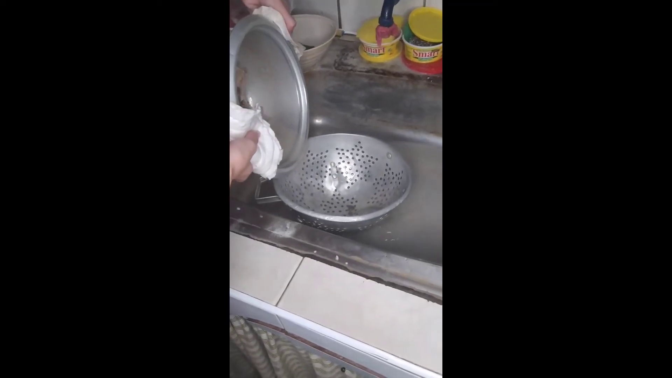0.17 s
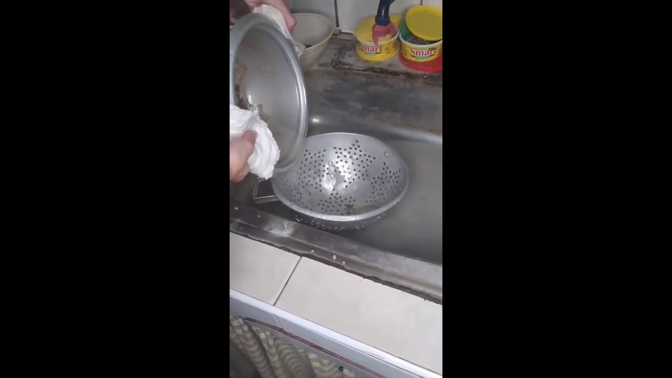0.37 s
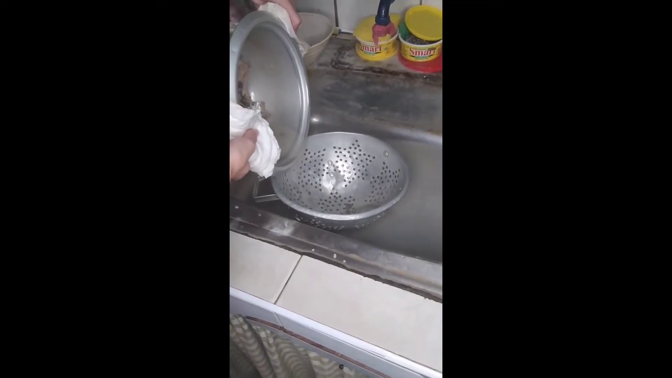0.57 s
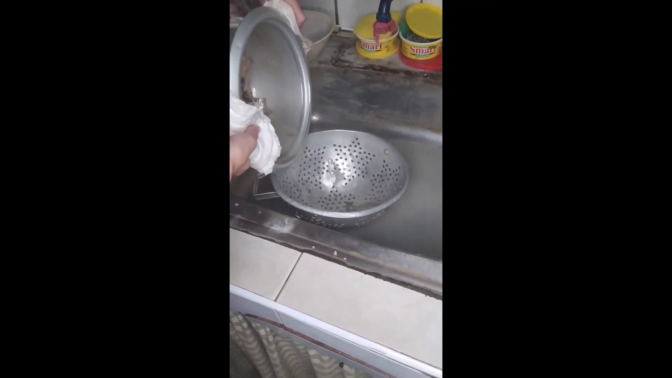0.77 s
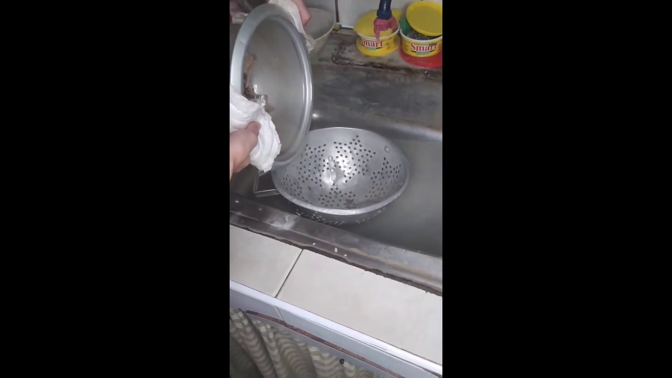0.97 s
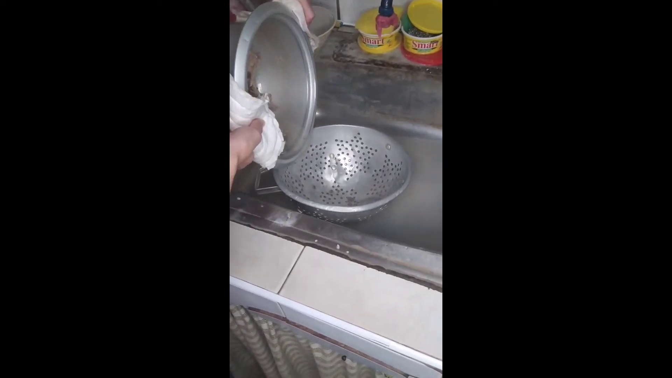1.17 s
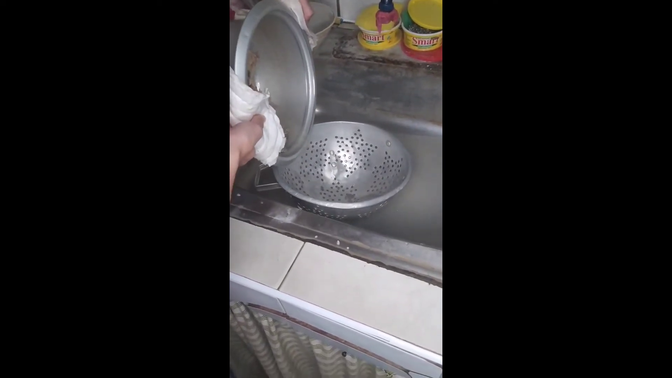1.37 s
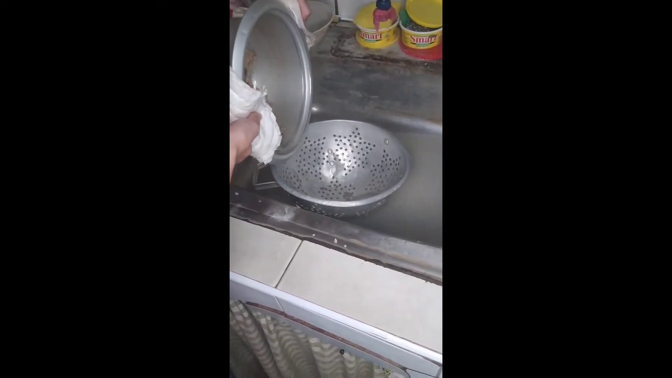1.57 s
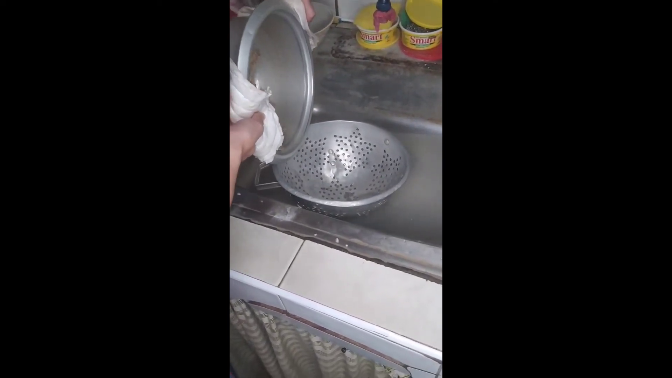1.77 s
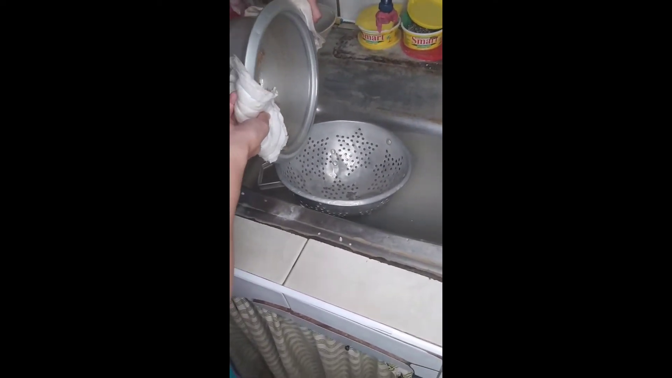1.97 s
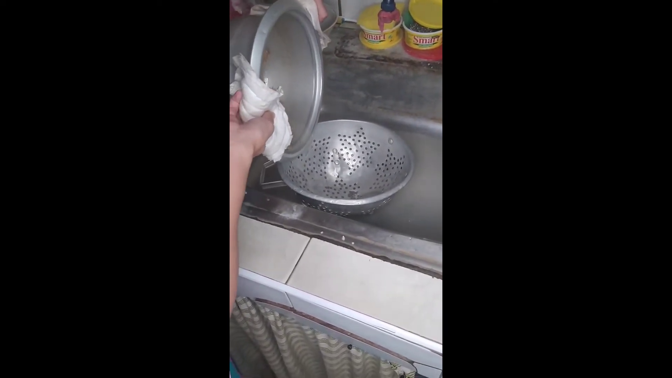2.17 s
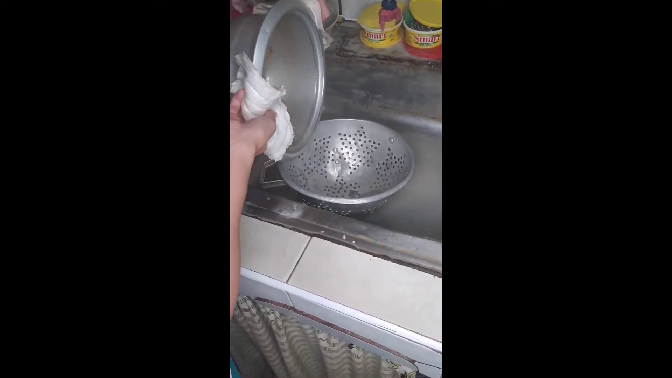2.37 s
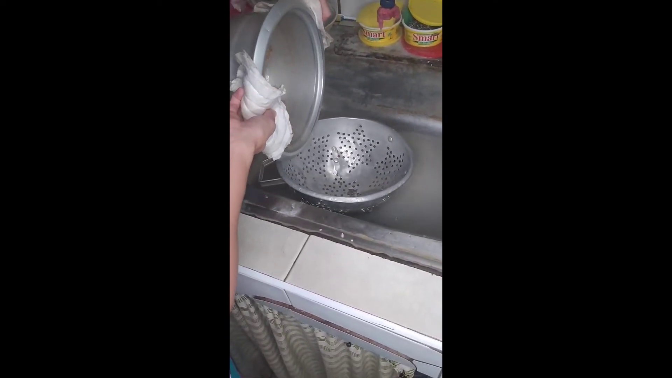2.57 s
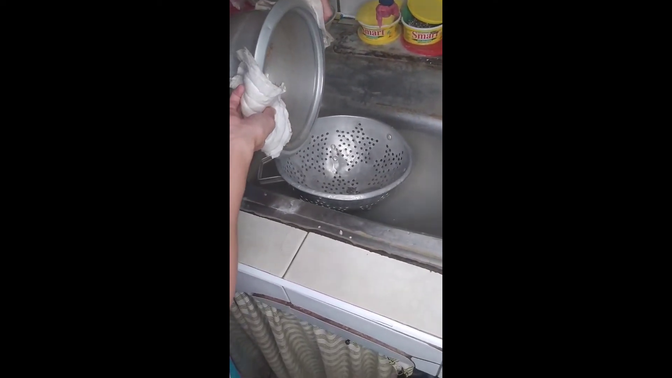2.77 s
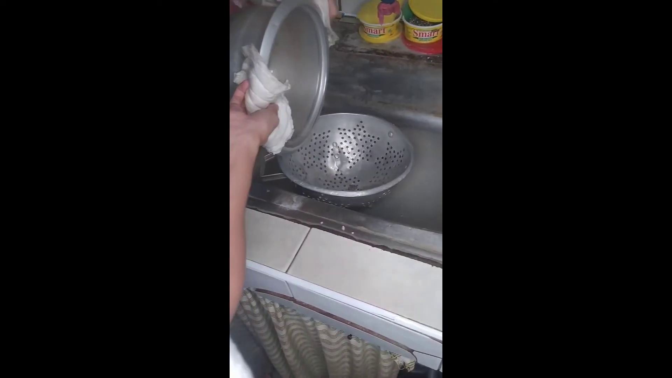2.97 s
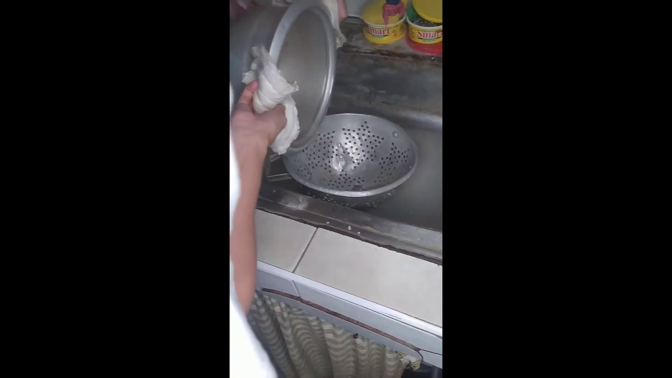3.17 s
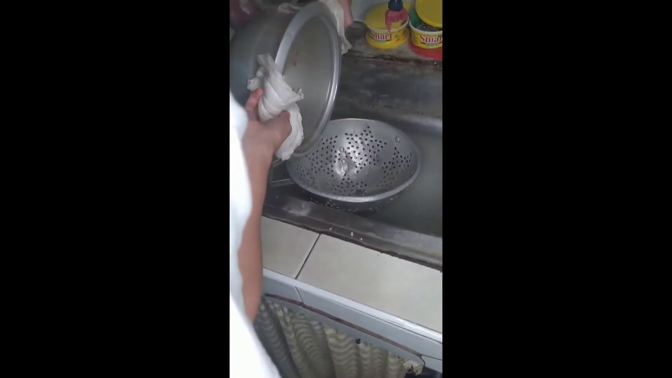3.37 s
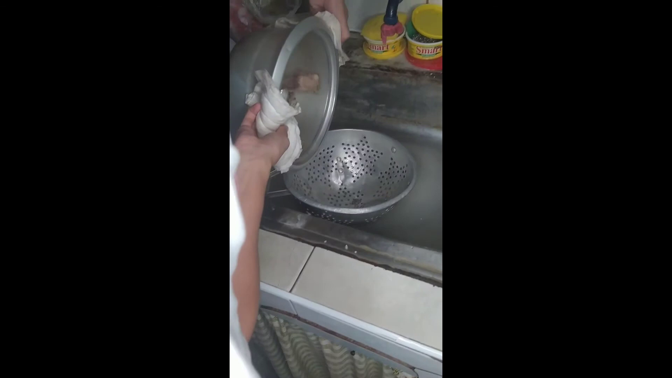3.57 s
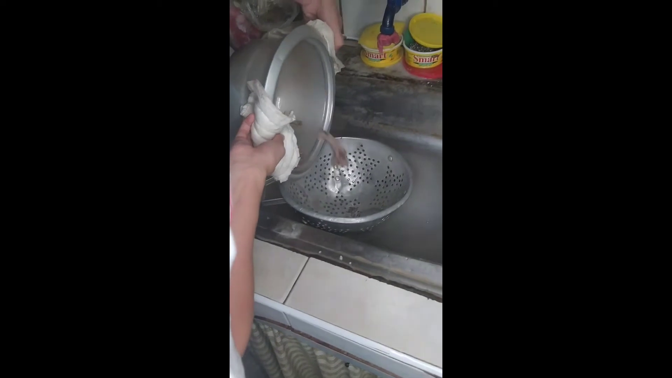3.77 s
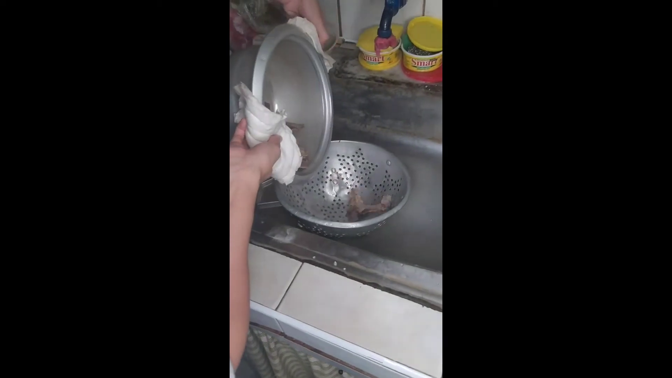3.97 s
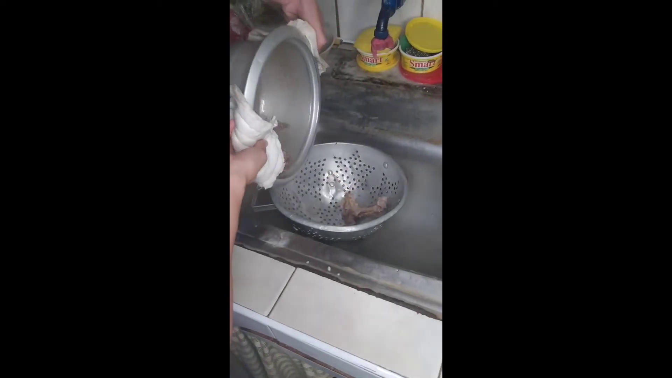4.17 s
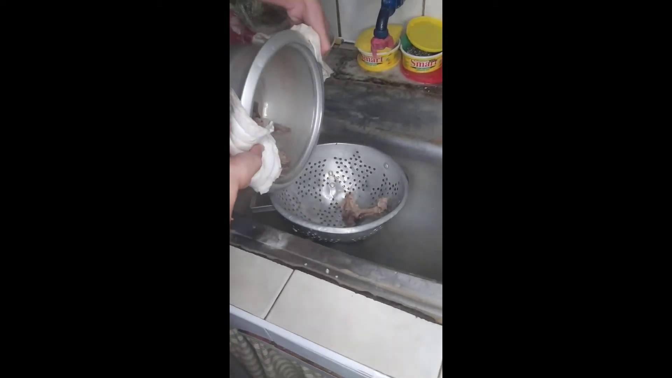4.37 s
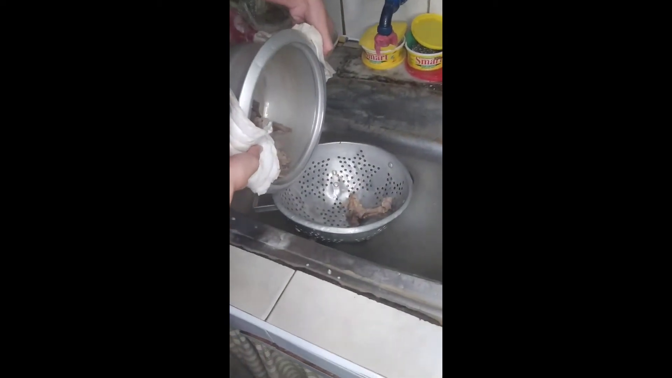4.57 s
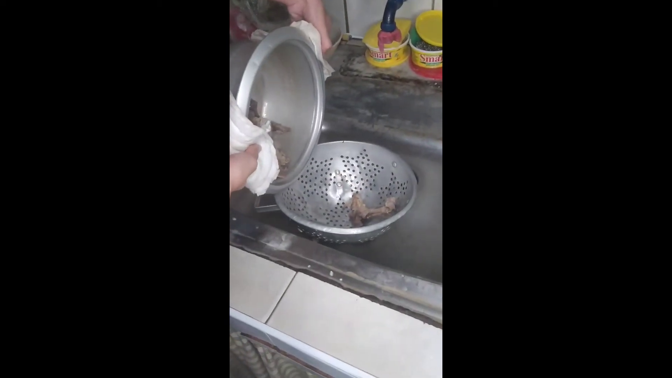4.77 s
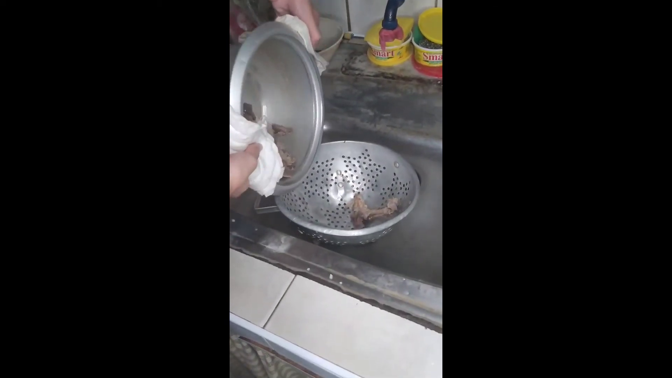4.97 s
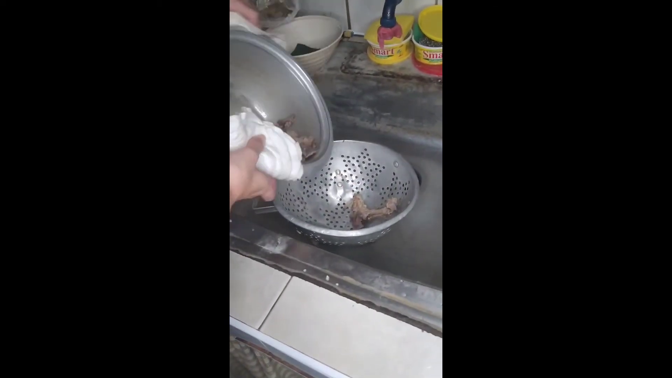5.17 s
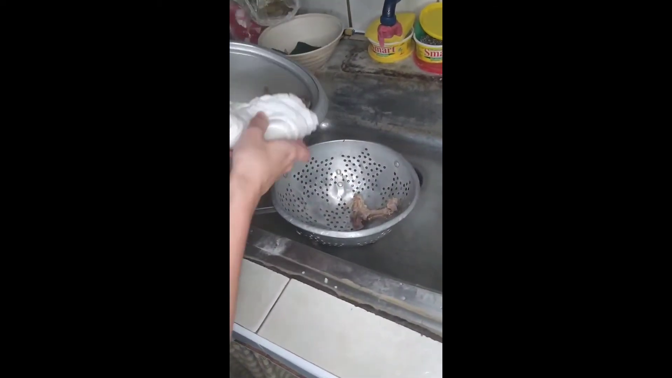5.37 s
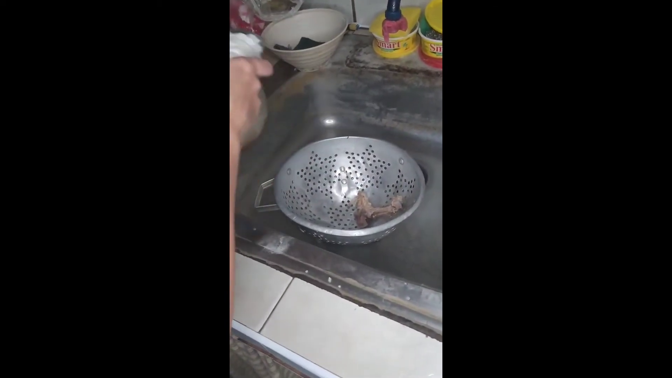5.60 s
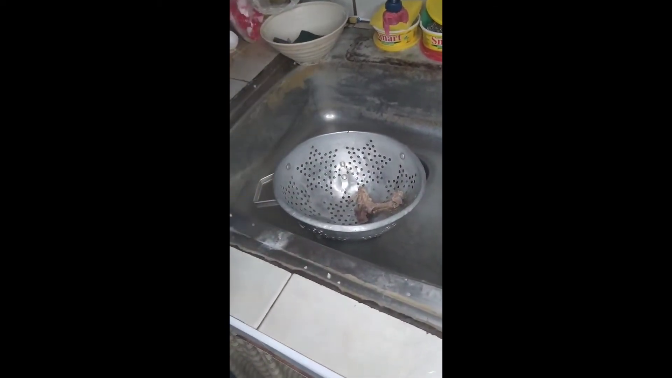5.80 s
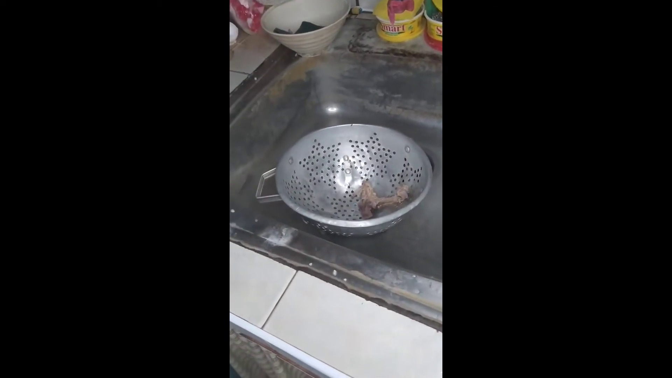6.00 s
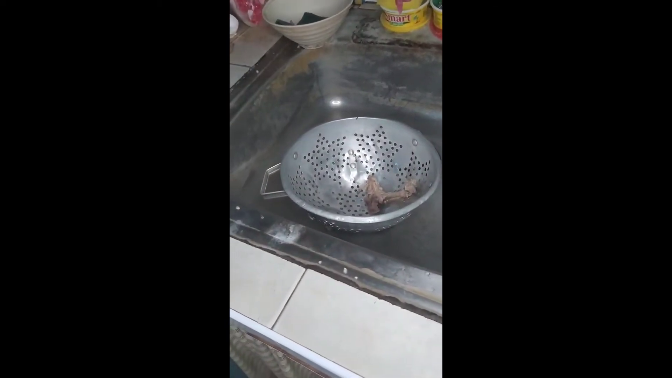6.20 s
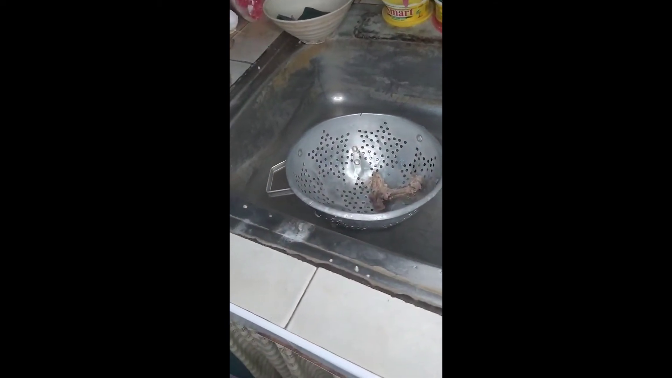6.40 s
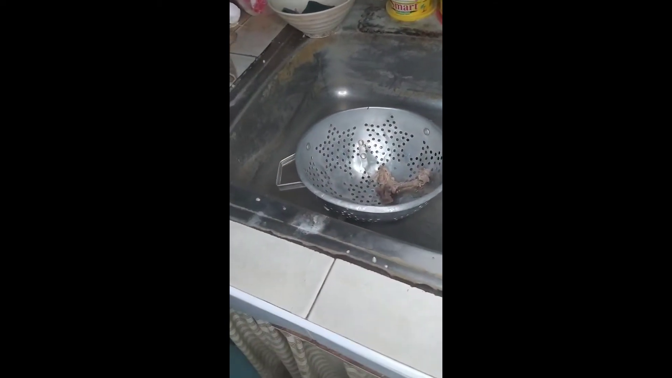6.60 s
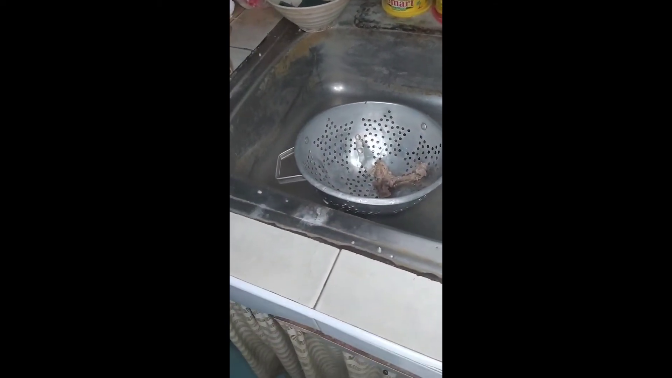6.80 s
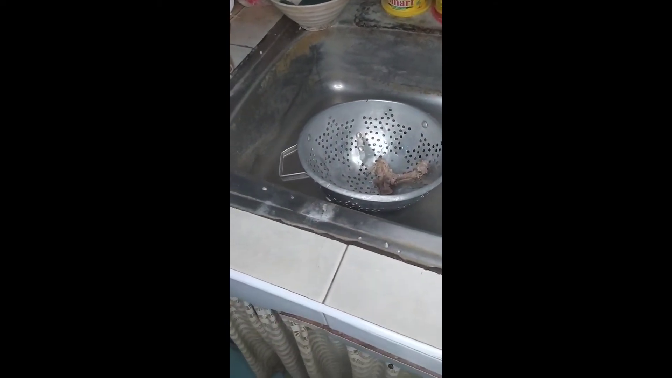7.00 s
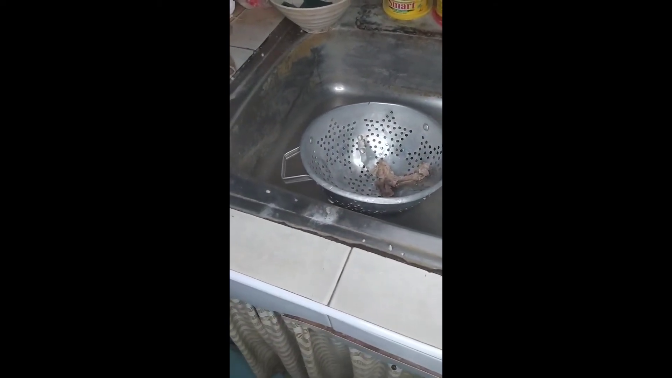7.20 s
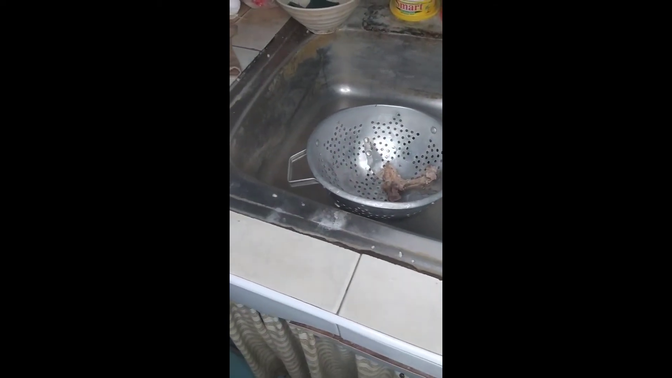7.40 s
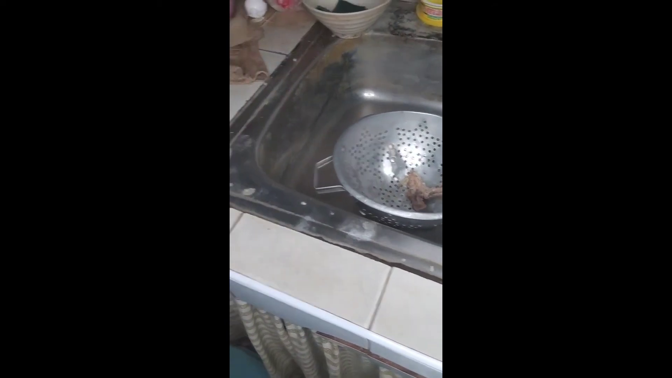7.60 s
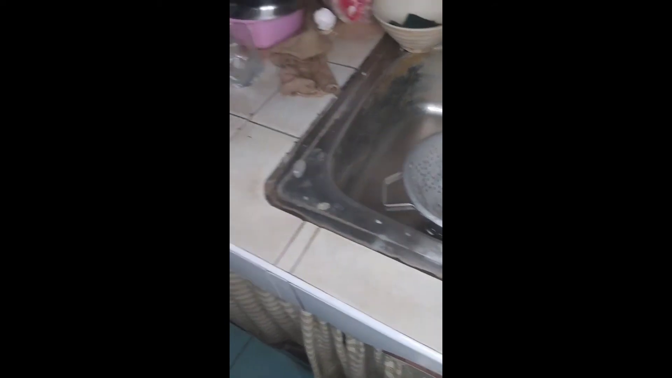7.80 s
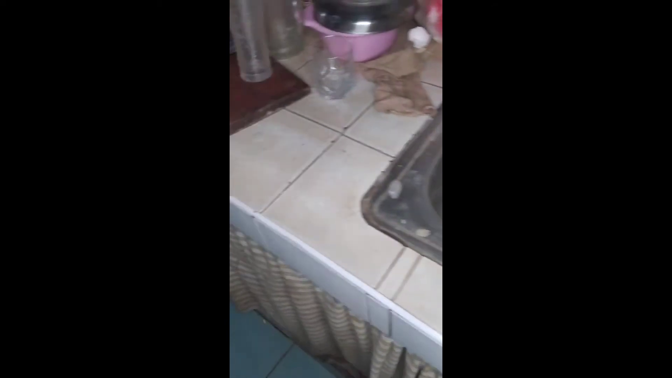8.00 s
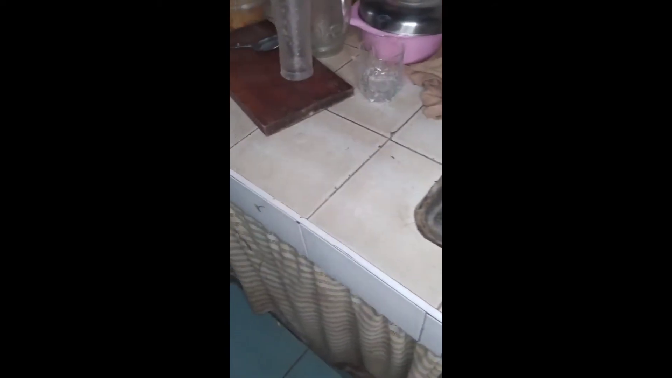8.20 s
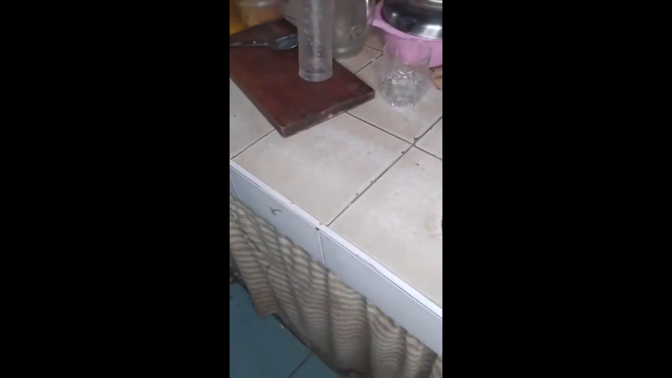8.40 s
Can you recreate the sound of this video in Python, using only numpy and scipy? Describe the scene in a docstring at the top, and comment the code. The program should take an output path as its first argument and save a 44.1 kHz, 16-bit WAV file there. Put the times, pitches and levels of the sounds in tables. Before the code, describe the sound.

Close in a small kitchen, a thinning trickle of liquid spatters brightly into a metal colander in a steel sink and stops. The pot rim clinks on the colander, then a bone drops in with a loud rattling, booming crash. The pot creaks, lands with a clonk and skids; cloth rustles, kitchenware knocks, and a heavy object groans along the counter. Handheld stereo pickup with low rumble and faint hiss.

```python
"""The last of a pot of stock trickles through a metal colander in a steel sink, over rumble, hiss and deep
buffeting. The pot's rim clinks on the colander, the pot creaks, and cloth swishes briefly; then a bone crashes
into the colander. The pot creaks as it swings away, lands with a clonk and skids; at the end a heavy object
groans along the counter. Cloth rustles and kitchenware knocks from early on to near the end. Impacts are
decaying modes and noise bursts; water and friction are coloured noise with irregular gains, and the groan is a
set of tones of wavering pitch."""
import sys
import numpy as np
from scipy import signal
from scipy.fft import rfft, irfft
from scipy.io import wavfile
from scipy.ndimage import uniform_filter1d

SR = 44100
rng = np.random.default_rng(int(sys.argv[2]) if len(sys.argv) > 2 else 0)


def store_wav(level_fs):
    """Save 16-bit WAV to argv[1]."""
    pcm = np.round(np.clip(np.atleast_2d(level_fs), -1, 1) * 32767)
    wavfile.write(sys.argv[1], SR, pcm.T.astype(np.int16))


N = 372644

# Levels in the tables are relative: the functions add the gain of each layer.
# slow drift of the kitchen's rumble and of a separate deep buffeting: time_s, rumble_db, deep_buffeting_db
LOW_NOISE_DRIFT = [(0, -58, -72), (1.7, -60, -65.5), (2.4, -63, -68), (4.7, -63.5, -63), (5.3, -64, -66.5),
                   (6.4, -66, -68), (7.3, -65.5, -62.5), (8.44, -65, -67)]
# the trickle thins out and stops: time_s, level_db
FLOW_LEVEL = [(0.0, -61.5), (0.14, -58.5), (0.9, -62), (1.75, -64), (1.92, -73), (2.3, -91)]
# large drops from the lip of the pot: start_s, level_db, pitch_hz
LARGE_DROPS = [(0.1151, -37, 8700), (0.16, -36, 9100), (0.294, -33, 10150), (0.338, -38.5, 10900),
               (0.355, -35.5, 9150), (0.472, -41, 9100), (0.572, -39.5, 10700), (0.7924, -39.5, 9200),
               (0.8979, -41, 8100), (1.012, -43, 3840), (1.1, -41.5, 10600), (1.2003, -41, 9740)]
# knocks of kitchenware: start_s, hollow_body_db, bright_tick_db, left_right_db, room_db
KNOCKS = [(1.32, -54.5, -45, 6, -2), (1.698, -76, -54, 6, 1), (1.843, -61, -52.5, 8, -7),
          (3.311, -65, -57, 0, -23), (3.454, -82, -59, 2, 1), (3.656, -71, -53.5, -4, -18),
          (3.836, -50.5, -49, -3, -1), (6.9935, -53, -42, 8, -3.5), (7.1783, -39, -52, 7.5, -1),
          (7.6, -53, -46.5, 7, -4.5), (7.69, -38.5, -36, 5, -9.5), (7.705, -51.5, -45.5, 9, -5),
          (7.816, -51, -74, -1, -9)]
# the pot nudges the colander and the sink answers: start_s, body_db, tick_db, sink_boom_db
NUDGES = [(1.579, -40.5, -47, -20), (2.8242, -50, -80, -41)]
# strokes of cloth and hands over metal: start_s, length_s, fine_hiss_db, coarse_rubbing_db
STROKES = [(2.47, 0.28, -68, -65.5), (3.428, 0.25, -75, -67), (4.425, 0.27, -67, -65),
           (5.439, 0.23, -58, -65.5), (5.977, 0.2, -61, -69), (6.212, 0.2, -55, -67.5),
           (6.45, 0.24, -62, -67.5), (6.994, 0.15, -58.5, -60), (7.148, 0.059, -56, -65),
           (7.411, 0.33, -70, -66), (7.602, 0.16, -56, -71), (7.708, 0.32, -62, -64),
           (7.958, 0.13, -54, -66), (8.15, 0.098, -53.5, -76), (8.31, 0.51, -53, -63.5)]
# a brief swish, like the strokes above but in one narrow high band: start_s, level_db, length_s, pitch_hz
SWISHES = [(3.132, -53.5, 0.042, 11300)]
# the bone lands, bounces and flops over: start_s, rattle_db, thud_db
BOUNCES = [(3.9293, -8.5, -28), (3.9332, 0, -6.5), (3.9434, -4.5, 3), (3.952, -1.5, -11),
           (3.9648, -8.5, -16), (3.9816, -22, 6), (4.008, -22, -3.5)]
# the pot and its handle slip as it is tilted and swung away: start_s, level_db, t60_s
CREAKS = [(2.272, -56, 0.061), (5.101, -58.5, 0.28), (5.143, -53.5, 0.14), (5.189, -56.5, 0.25),
          (5.212, -52, 0.12), (5.238, -52, 0.079), (5.359, -46.5, 0.047), (5.389, -54, 0.071),
          (5.688, -48.5, 0.054), (5.722, -53, .05)]
# the pot lands on its base and rocks: start_s, force_db
LANDINGS = [(5.781, 4), (5.805, 1.5)]

# modes of the steel sink: pitch_hz, level_db, t60_s (before any extra damping)
SINK_MODES = [(50, -41, 0.66), (125.6, -33, 0.35), (171.5, -21.5, 0.36), (191.7, -26.5, 0.35),
              (251.6, -31, 0.49), (383, -35, 0.36), (453, -40.5, 1.24), (482, -34.5, 0.65),
              (562, -30.5, 0.43), (610, -26.5, 0.31), (828, -20, 0.37), (860, -39, 0.71), (932, -26, 0.39),
              (1060, -30.5, 0.5), (1183, -29, 0.44), (1360, -32, 0.54), (1494, -38, 0.59)]
# modes of the colander: pitch_hz, level_db, t60_s
COLANDER_MODES = [(3610, -43, .29), (4700, -32, .25), (5635, -53, 0.2), (7235, -48, 0.49), (9000, -40, .26),
                  (10040, -38, .28)]
# modes of the pot's rim: pitch_hz, level_db, t60_s
RIM_MODES = [(522, 5, 0.068), (543, -11, 0.44), (687, -9, 0.43), (1162, -14, 0.33), (1296, 7.5, 0.031),
             (1374, -13, 0.48), (1865, -12.5, .42), (2000, 9, .018), (2730, -11, .26), (3025, -8.5, 0.21)]
# modes of the pot's base: pitch_hz, level_db, t60_s
POT_MODES = [(491, -37, 0.41), (547.5, -33, 0.29), (825, -44.5, 0.31), (935, -47.5, 0.54),
             (1399, -48, 0.59), (1430, -42.5, 0.56), (1675, -53, 0.47), (1830, -49, 0.29),
             (1970, -43.5, 0.16), (2440, -55, 0.54), (2700, -57, 0.43)]
# short, damped modes of a knocked body: pitch_hz, level_db (before brightening), t60_s
SHELL_MODES = [(571, 3.5, 0.024), (1280, 10.5, 0.012), (1884, -1.5, 0.033), (2620, 1.5, 0.032)]
# modes of other kitchenware that ring on: pitch_hz, level_db, t60_s
WARE_MODES = [(610, -6, 0.3), (670, -9.5, 0.38), (1214, -14.5, 0.45), (2000, -16, 0.44), (2420, -17, .4)]
# resonances of the counter: pitch_hz, width_hz (before scaling), level_db
COUNTER_PEAKS = [(254, 200, -2.5), (537, 140, -6), (905, 210, -11.5), (1280, 150, -13.5), (1810, 80, -13.5),
                 (2470, 110, -10.5)]
# resonances of the skid over steel: pitch_hz, width_hz (before scaling), level_db
SKID_PEAKS = [(3220, 470, -3), (4080, 360, -2), (6840, 900, -5), (10800, 2800, -1.5)]
# partials of stick and slip on the counter: pitch_hz (before sinking), rms_wander_hz, level_db
GROAN_PARTIALS = [(280, 24, -2.5), (546, 11.85, -3), (867, 26, -15)]

# spectrum of the bone's crash: frequency_hz, level_db
CRASH_COLOUR = [(40, -35), (90, -41), (150, -15.5), (330, -18.5), (550, -13.5), (900, -12), (1450, -14.5),
                (2200, -22.5), (3300, -25.5), (5000, -23.5), (10500, -18), (12500, -24.5), (16000, -54)]
# spectrum of the pot's clonk: frequency_hz, level_db
CLONK_COLOUR = [(200, -16), (450, 6.5), (680, -14), (900, -4), (1800, -7.5), (3200, -13.5), (6000, -13.5),
                (10500, -7), (13000, -17), (16000, -41)]
# spectrum of a hollow body: frequency_hz, level_db
HOLLOW_COLOUR = [(60, -27), (170, -11), (330, -3), (580, 0), (780, -1), (1000, -2), (1350, -4), (1650, -3),
                 (2700, -4), (3800, -12.5), (8000, -15), (16000, -41.5)]
# spectrum of a sharp tick: frequency_hz, level_db
TICK_COLOUR = [(500, -22), (2500, -6.5), (5000, -4.5), (7500, 1), (10800, 9), (13000, -2.5), (16000, -16)]
# spectrum of fine hiss: frequency_hz, level_db
HISS_COLOUR = [(1000, -39), (3000, -14.5), (5500, -14.5), (7500, -10), (9500, -5), (11200, -3),
               (12600, -14.5), (16000, -23)]
# spectrum of coarse rubbing: frequency_hz, level_db
RUB_COLOUR = [(200, -15), (600, -5), (1200, -2), (2400, -0.5), (3800, -7), (7000, -15.5), (16000, -54)]
# spectrum of the kitchen's rumble: frequency_hz, level_db
RUMBLE_COLOUR = [(15, 1), (50, -9.5), (75, -0.5), (125, 0), (170, -4.5), (220, -1.5), (290, -1.5),
                 (390, -9), (530, -9.5), (750, -14.5), (1500, -23.5), (4000, -51)]
# spectrum of deep buffeting: frequency_hz, level_db
DEEP_COLOUR = [(15, 1.5), (40, -7), (55, -12), (100, -20.5), (400, -57)]
# ring of the kitchen and its metal: frequency_hz, t60_s
RING_TIMES = [(60, 1), (500, 0.66), (3000, 0.61), (10000, 0.47)]
# likeness of noise at the two microphones: frequency_hz, coherence (0 to 1)
COHERENCE = [(20, 0.19), (120, 0.9), (280, 0.65), (500, 0.58), (1000, 0.022)]
# the left microphone is brighter: frequency_hz, left_right_db
MICROPHONE_TILT = [(11000, 0), (13000, 4)]

HISS_DB, MURK_DB = -65, -70  # steady hiss and midrange noise of the kitchen
STROKE_SKEW = 0.65  # exponent below 1: a stroke peaks before its middle
STROKE_ECHO_S, STROKE_WET = 0.081, 0.41  # the room holds each stroke: decay time constant, share of the power
SKID_S, SKID_DB, SKID_RISE_S, SKID_T60_S = 6.281, -41, 0.022, 0.28
HARDNESS = .25  # dB per octave by which the body brightens for each dB of tick above it
SHOVE_S, SHOVE_DB = 8.179, -49  # the push starts
SHOVE_HOLD_S, SHOVE_EASE_S, SLIDE_DB = 0.067, 0.18, -14  # it holds, then eases into a quieter slide
SAG, SAG_S = .17, .14  # the groan's pitch sinks by this share, over this time from its start
SPRAY_DB, WASH_DB = 1, -5.5  # fine spray and the wash over the steel, relative to the flow
PATTER_PER_S, PATTER_DB = 220, -6  # tiny droplets on the steel: mean rate, level relative to the flow
SMALL_DROP_DB, BIG_DROP_DB = -2.5, -3  # gains of the small and large drops
DROP_RISE_S, DROP_T60_S = 0.002, 0.039  # each drop swells (time constant) and dies away
BASIN_ECHO_DB, BASIN_S = 4.5, 0.0077  # the steel walls reflect: level, scale of the delays
EDGE_HZ = 15900  # upper band limit


def amp(db):
    """Logarithmic level: decibels become an amplitude ratio."""
    return 10 ** (np.asarray(db) / 20)


def evened(x):
    """Normalisation of mean power: the signal is scaled to rms 1."""
    return x / np.sqrt(np.mean(x ** 2) + 1e-20)


def read(points, hz):
    """Logarithmic pitch scale: a table is interpolated along log frequency."""
    f, value = np.transpose(points)
    return np.interp(np.log(hz + 1), np.log(f + 1), value)


def follow(rows):
    """Slow amplitude modulation: levels interpolated in decibels become gain curves."""
    s, *levels = np.transpose(rows)
    t = np.arange(N) / SR
    return [amp(np.interp(t, s, db)) for db in levels]


def add(mix, s, sound):
    """Superposition: a stereo sound is summed into the mix from time s."""
    part = mix[:, round(s * SR):][:, :sound.shape[-1]]
    part += sound[..., :part.shape[1]]


def panned(db):
    """Interaural level difference: half the decibels go to each side, with opposite signs."""
    return amp(np.array([[db], [-db]]) / 2)


def dying(t60, rise=.001):
    """Exponential damping: one second that rises quickly and loses 60 dB per t60."""
    t = np.arange(SR) / SR
    return (1 - np.exp(-t / rise)) * np.exp(-np.log(1000) * t / t60)


def noise(colour, size=SR):
    """Diffuse-field coherence: coloured noise alike in the bass and nearly unrelated in the treble."""
    hz = np.fft.rfftfreq(size, 1 / SR)
    left, other = rfft(rng.standard_normal((2, size)))
    same = np.clip(read(COHERENCE, hz), -1, 1)
    right = same * left + np.sqrt(1 - same ** 2) * other
    spectrum = np.array([left, right]) * amp(read(colour, hz))
    return evened(irfft(spectrum, size))


def fizz(hz, spread, skirt_db, size):
    """Band-limited noise: random energy is gathered around one pitch."""
    lower = [(hz / spread ** 3, 2 * skirt_db), (hz / spread, skirt_db)]
    upper = [(hz * spread, skirt_db), (hz * spread ** 3, 2 * skirt_db)]
    return noise(lower + [(hz, 0)] + upper, size=size)


def tail(colour, rise=.012):
    """Frequency-dependent damping: a crowd of metal and room modes, each band dying at its own speed."""
    hz, t, z = signal.stft(noise(colour), SR, nperseg=256)
    decay = np.exp(-np.log(1000) * t / read(RING_TIMES, hz)[:, None])
    ring = signal.istft(z * decay, SR, nperseg=256)[1][:, :SR]
    return ring * (1 - np.exp(-np.arange(SR) / SR / rise))


def ringing(modes, build_turns, spread_hz):
    """Modal superposition: damped sines swell over a few cycles, with wider phase between the ears higher up."""
    t, out = np.arange(SR) / SR, np.zeros((2, SR))
    for hz, db, t60 in modes:
        apart = rng.choice([-1, 1]) * min((hz / spread_hz) ** 2, np.pi / 2)
        phase = 2 * np.pi * rng.random() + np.array([[.5], [-.5]]) * apart
        out += amp(db) * dying(t60, build_turns / hz) * np.sin(2 * np.pi * hz * t + phase)
    return out


def shimmer(colour, lowest_hz, count):
    """Modal density of thin metal: many high modes of uneven strength and life."""
    place, strength, life = rng.random((3, count))
    hz = lowest_hz * (11500 / lowest_hz) ** ((np.arange(count) + place) / count)
    db = read(colour, hz) + 10 * np.log10(hz / lowest_hz) - 10 * strength
    t60 = read(RING_TIMES, hz) * (1 + (life - .5) / 2)
    return ringing(np.c_[hz, db, t60], build_turns=14.0, spread_hz=lowest_hz)


def resonances(peaks, width_scale):
    """Resonance curves: summed peaks give a spectrum as rows of frequency_hz, level_db."""
    hz = np.geomspace(60, 16000, num=600)
    response = sum(amp(db) / (1 + (2 * (hz - f) / (width_scale * w)) ** 2) for f, w, db in peaks)
    return np.c_[hz, 20 * np.log10(response)]


def flutter(depth_db, size):
    """Random amplitude modulation: a gain wanders smoothly; size is the smoothing in samples."""
    smooth = uniform_filter1d(uniform_filter1d(rng.standard_normal(N), size), size)
    return amp(depth_db * evened(smooth))


def sputter(size, depth_db, grain_s):
    """Granular modulation: the gain glides to a new random level over each short grain."""
    t = np.arange(size) / SR
    grains = np.interp(t / max(grain_s, 1 / SR), np.arange(size), rng.standard_normal(size))
    return evened(amp(depth_db * np.minimum(grains, 2)))


def basin(x, count=8):
    """Comb filtering: early reflections from the walls of the sink interfere with the direct sound."""
    walls = np.zeros((2, SR // 20))
    walls[:, 0] = 1  # direct sound
    for side in walls:
        at = ((.1 + rng.random(count)) * min(BASIN_S, .03) * SR).astype(int)
        side[at] += amp(BASIN_ECHO_DB) * rng.choice([-1, 1], count) / np.sqrt(count)
    walls /= np.linalg.norm(walls, axis=1, keepdims=True)
    return signal.oaconvolve(x, walls, axes=1)[:, :N]


def boom(soft_hz, damping):
    """Contact time limits bandwidth: a soft blow wakes mainly the low modes of the sink."""
    modes = [(hz, db - 10 * np.log10(1 + (hz / soft_hz) ** 3), t60 / damping) for hz, db, t60 in SINK_MODES]
    return ringing(modes, build_turns=2.0, spread_hz=500)


def buffeting():
    """Low-frequency noise: a deep buffeting whose level drifts slowly."""
    _, deep = follow(LOW_NOISE_DRIFT)
    return amp(5.5) * deep * noise(DEEP_COLOUR, size=N)


def kitchen():
    """Stationary broadband noise: steady faint hiss over a slowly drifting rumble."""
    low, _ = follow(LOW_NOISE_DRIFT)
    hiss = amp(HISS_DB) * noise(HISS_COLOUR, size=N) * flutter(depth_db=2.0, size=600)
    murk = amp(MURK_DB) * noise(RUB_COLOUR, size=N) * flutter(depth_db=2.0, size=900)
    rumble = amp(2.0) * low * noise(RUMBLE_COLOUR, size=N)
    return hiss + murk + rumble


def cloth():
    """Friction noise: strokes swell, crackle and fade, fine hiss over coarser rubbing of varied pitch."""
    out, t = np.zeros((2, N)), np.arange(SR) / SR
    keep, wet = np.exp(-1 / (STROKE_ECHO_S * SR)), np.clip(STROKE_WET, 0, 1)
    for s, length, fine_db, coarse_db in STROKES:
        power = np.sin(np.pi * np.minimum(t / length, 1) ** STROKE_SKEW) ** 2
        held = signal.lfilter([1 - keep], [1, -keep], power)
        envelope = np.sqrt((1 - wet) * power + wet * held)
        pitch = rng.uniform(.92, 1.2)
        rub = [(f * pitch, db) for f, db in RUB_COLOUR]
        add(out, s, envelope * (amp(fine_db + 2.0) * noise(HISS_COLOUR) + amp(coarse_db + 3.5) * noise(rub)))
    return out * flutter(depth_db=1.5, size=500) * sputter(N, depth_db=3, grain_s=.002)


def swishes():
    """Sliding friction: a brief swish sounds in a narrow, grainy band of noise."""
    out = np.zeros((2, N))
    for s, db, length, hz in SWISHES:
        u = np.linspace(0, 1, int(length * SR))
        swell = np.sin(np.pi * u ** STROKE_SKEW)
        add(out, s, amp(db) * fizz(hz, spread=1.1, skirt_db=-10.0, size=len(u)) * swell)
    return out * flutter(depth_db=3.5, size=100)


def knocks():
    """Impact spectrum: a sharp tick and a damped hollow body; relatively stronger ticks brighten the body."""
    out = np.zeros((2, N))
    for s, body_db, tick_db, side_db, room_db in KNOCKS:
        tick = amp(tick_db + 12.5) * noise(TICK_COLOUR) * dying(t60=.01, rise=.0003)
        tilt = HARDNESS * np.clip(tick_db - body_db, -20, 10)  # dB per octave
        pivot_hz = SHELL_MODES[1][0]
        shell = [(hz, db + tilt * np.log2(hz / pivot_hz), t60) for hz, db, t60 in SHELL_MODES]
        body = ringing(shell, build_turns=1.3, spread_hz=610)
        body += amp(-3) * noise(HOLLOW_COLOUR) * dying(t60=.028, rise=.0003)
        room = amp(body_db - 5.0) * tail(HOLLOW_COLOUR, rise=0.0041)
        room += amp(tick_db - 4.0) * tail(TICK_COLOUR, rise=0.001)
        room += amp(body_db) * ringing(WARE_MODES, build_turns=2.4, spread_hz=520)
        add(out, s, panned(side_db) * (tick + amp(body_db) * body) + amp(room_db) * room)
    return out


def shove(width_scale=0.97):
    """Stick-slip oscillation: a wavering groan sinks in pitch while friction shakes the counter."""
    t = np.arange(N) / SR - SHOVE_S
    start = np.clip(t / 0.0056, 0, 1) * amp(SHOVE_DB)
    push = amp(SLIDE_DB * np.clip((t - SHOVE_HOLD_S) / SHOVE_EASE_S, 0, 1))
    speed = 1 - SAG * np.clip(t / SAG_S, 0, 1) ** 4
    groan = 0
    for hz, wander_hz, db in GROAN_PARTIALS:
        wander = evened(uniform_filter1d(rng.standard_normal(N), size=300))
        phase = 2 * np.pi * np.cumsum(hz * speed + wander_hz * wander) / SR
        groan += amp(db) * flutter(depth_db=1.5, size=350) * np.sin(phase)
    shaking = amp(-1.5) * np.sqrt(push) * noise(resonances(COUNTER_PEAKS, width_scale), size=N)
    return start * (push * groan + shaking)


def skid(width_scale=1.2):
    """Friction-driven resonance: metal skids over steel with a quick bright swish."""
    out = np.zeros((2, N))
    swish = noise(resonances(SKID_PEAKS, width_scale)) * dying(SKID_T60_S, SKID_RISE_S)
    add(out, SKID_S, amp(SKID_DB) * swish)
    return out * flutter(depth_db=-0.5, size=150)


def nudges():
    """Coupled vibration: the pot's rim clinks on the colander, and the sink booms a moment later."""
    out = np.zeros((2, N))
    for s, db, tick_db, boom_db in NUDGES:
        tick = amp(tick_db + 8.5) * noise(TICK_COLOUR) * dying(t60=0.043, rise=0.00064)
        body = amp(6) * noise(HOLLOW_COLOUR) * dying(t60=0.049, rise=0.00054)
        body += amp(-7.0) * tail(HOLLOW_COLOUR, rise=0.0048)
        body += ringing(RIM_MODES, build_turns=1.7, spread_hz=830)
        add(out, s, tick + amp(db) * body)
        add(out, s + 0.0079, amp(boom_db) * boom(soft_hz=224, damping=0.88))
    return out


def pot(creak_hz=500, base_hz=470):
    """Modal excitation: slips make the pot creak near its lowest mode; landing rings its whole body."""
    out, s = np.zeros((2, N)), LANDINGS[0][0]
    for at, db, t60 in CREAKS:
        mode = (creak_hz * rng.uniform(.96, 1.06), db + 6.0, t60)
        add(out, at, ringing([mode], build_turns=1.3, spread_hz=570))
    for at, db in LANDINGS:
        add(out, at, amp(db - 37.0) * noise(CLONK_COLOUR) * dying(t60=0.054, rise=0.0015))
    add(out, s, amp(-46) * tail(CLONK_COLOUR, rise=0.016))
    add(out, s, amp(-53) * shimmer(CLONK_COLOUR, lowest_hz=1700, count=40))
    thud = ringing([(base_hz, -18, .035)], build_turns=5.2, spread_hz=440)
    ring = amp(-1.5) * ringing(POT_MODES, build_turns=2.0, spread_hz=580)
    add(out, s + 0.00228, panned(1.4) * (thud + ring))
    return out


def bone():
    """Impact excitation: each bounce rattles the colander; the sink under it booms and rings on."""
    out, s = np.zeros((2, N)), BOUNCES[0][0]
    contact = [(1260, -15.5, 0.013), (1690, -12.5, 0.0089)]  # first hard contact: pitch_hz, level_db, t60_s
    add(out, s, ringing(contact, build_turns=0.51, spread_hz=880))
    for at, rattle_db, thud_db in BOUNCES:
        rattle = noise(CRASH_COLOUR) * dying(t60=0.093, rise=0.00054)
        add(out, at, amp(rattle_db - 17.5) * rattle * sputter(SR, depth_db=2, grain_s=.002))
        add(out, at, amp(thud_db) * boom(soft_hz=600, damping=5))
    add(out, s, amp(-26.5) * tail(CRASH_COLOUR, rise=0.012) * flutter(depth_db=1.5, size=120)[:SR])
    add(out, s, amp(-1.0) * ringing(SINK_MODES, build_turns=3.3, spread_hz=840))
    add(out, s + 0.0043, ringing(COLANDER_MODES, build_turns=8.7, spread_hz=2700))
    add(out, s + .003, amp(-29) * shimmer(CRASH_COLOUR, lowest_hz=1500, count=80))
    return out


def patter(count=24):
    """Random arrivals: tiny droplets each give a short damped ping, spread over a range of pitches."""
    out, t = np.zeros((2, N)), np.arange(SR // 50) / SR
    for hz in np.geomspace(3000, 12800, num=count):
        lands = rng.random(N) < PATTER_PER_S / count / SR
        size = amp(4 * np.minimum(rng.exponential(1, N), 3)) * lands
        tone = np.sin(2 * np.pi * (hz * t + rng.random((2, 1))))
        ping = np.sqrt(hz) * t * hz * np.exp(-t * hz / 6) * tone
        out += np.sqrt(hz) * signal.oaconvolve(size[None], ping, axes=1)[:, :N]
    return evened(out)


def splat(hz, spread):
    """Impulsive noise: a drop bursts on the metal in a brief, ragged spray of fizz."""
    size = SR // 8
    burst = fizz(hz, spread, skirt_db=-17, size=size) * sputter(size, depth_db=6, grain_s=.0015)
    return burst * dying(t60=DROP_T60_S, rise=DROP_RISE_S)[:size]


def trickle(count=260):
    """Jet breakup: a thin stream parts into many small drops and a few large, in a crackling spray."""
    (flow,) = follow(FLOW_LEVEL)
    start, end = FLOW_LEVEL[0][0], FLOW_LEVEL[-1][0]
    running = np.clip((end - np.arange(N) / SR) / .5, 0, 1)  # fades over the last half second
    spray = amp(SPRAY_DB) * noise(HISS_COLOUR, size=N) * flutter(depth_db=3.2, size=70)
    wash = amp(WASH_DB) * noise(RUB_COLOUR, size=N) * flutter(depth_db=3.5, size=400)
    out = running * flow * (spray + wash + amp(PATTER_DB) * patter())
    for when, pitch, size in rng.random((count, 3)):
        s = start + when * (end - start)
        size_db = 3 * min(-np.log(size), 2.5) + SMALL_DROP_DB + 7 * pitch
        add(out, s, amp(size_db) * flow[int(s * SR)] * splat(2100 * 5.6 ** pitch, spread=1.26))
    for s, db, hz in LARGE_DROPS:
        add(out, s, amp(db + BIG_DROP_DB) * splat(hz, spread=1.3))
    return out


def scene():
    """Linear superposition: the sources add, some of them through the reflections of the sink."""
    in_basin = basin(cloth() + swishes() + skid() + trickle())
    return buffeting() + kitchen() + in_basin + knocks() + shove() + nudges() + pot() + bone()


def record(dry):
    """Linear filtering: two microphones of unlike brightness, then an upper band limit."""
    tilt = read(MICROPHONE_TILT, np.fft.rfftfreq(N, 1 / SR))
    heard = irfft(rfft(dry) * amp(np.array([tilt, -tilt]) / 2), N)
    lowpass = signal.firwin(511, EDGE_HZ, window=("kaiser", 9), fs=SR)
    return signal.oaconvolve(heard, lowpass[None], "same")


dry = scene()
out = record(dry)
store_wav(out)
```